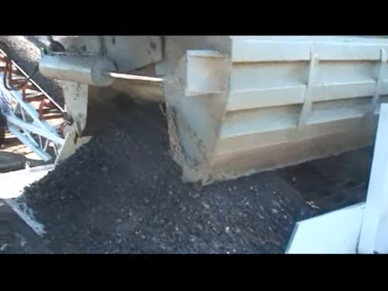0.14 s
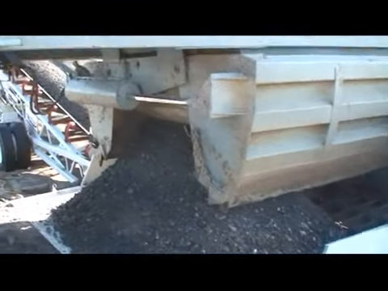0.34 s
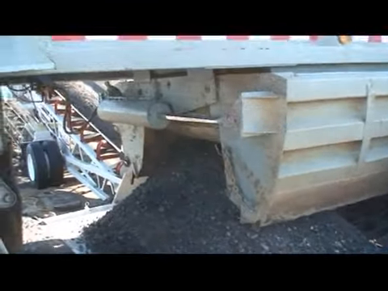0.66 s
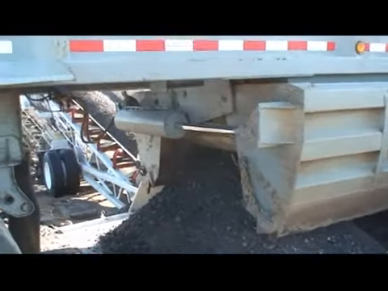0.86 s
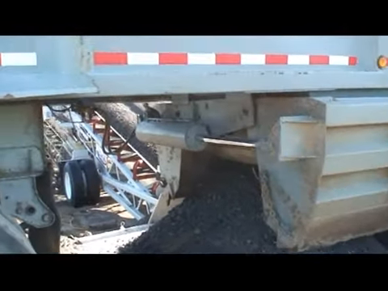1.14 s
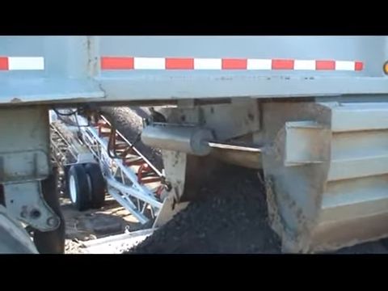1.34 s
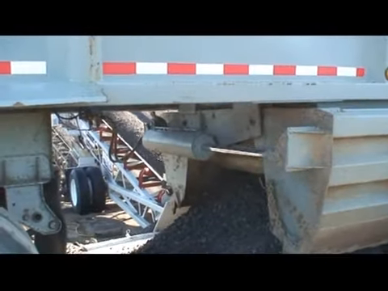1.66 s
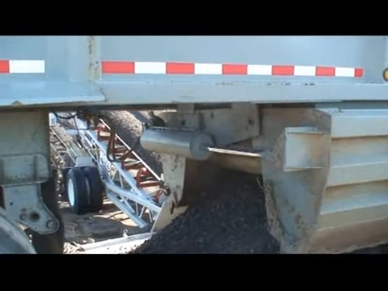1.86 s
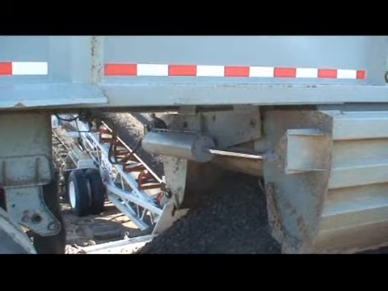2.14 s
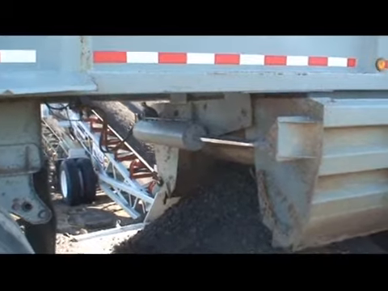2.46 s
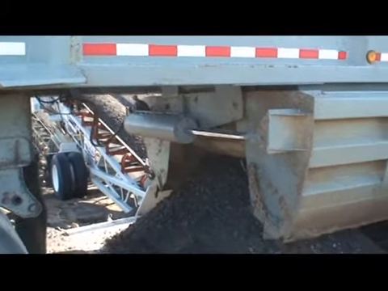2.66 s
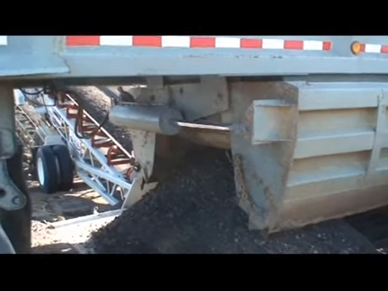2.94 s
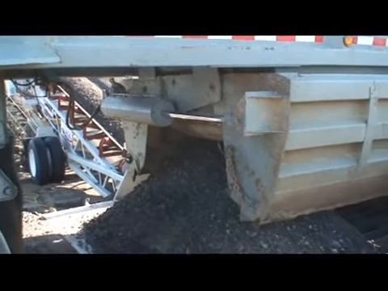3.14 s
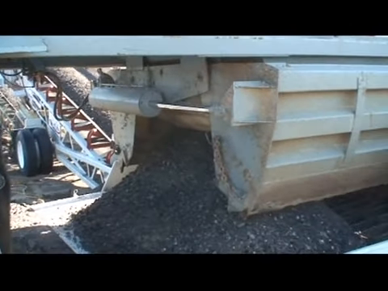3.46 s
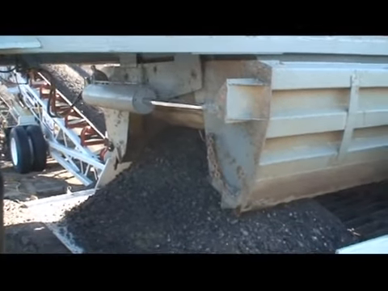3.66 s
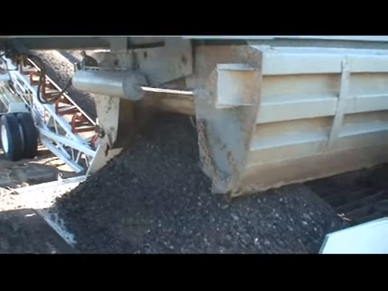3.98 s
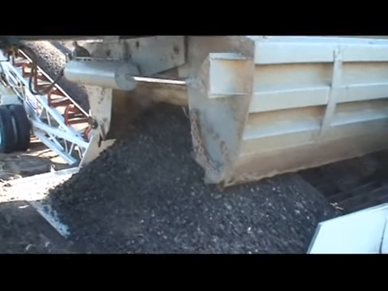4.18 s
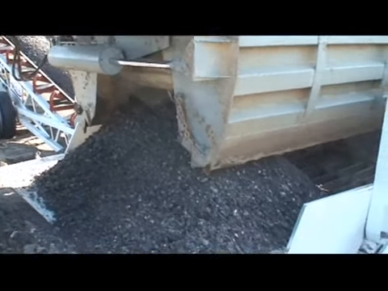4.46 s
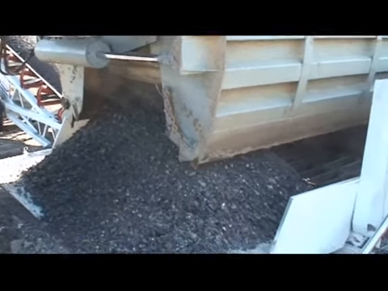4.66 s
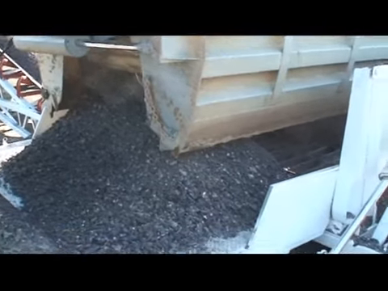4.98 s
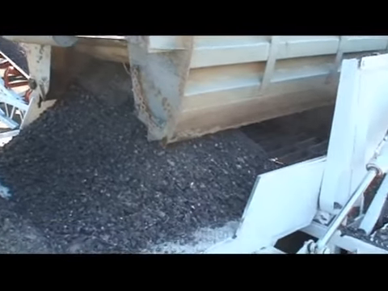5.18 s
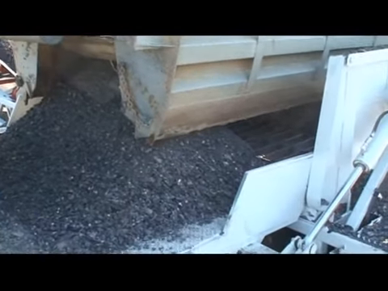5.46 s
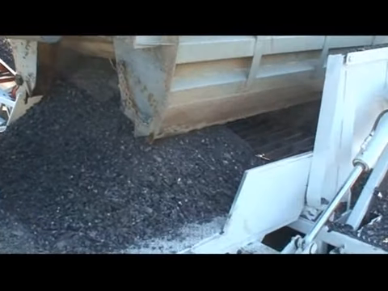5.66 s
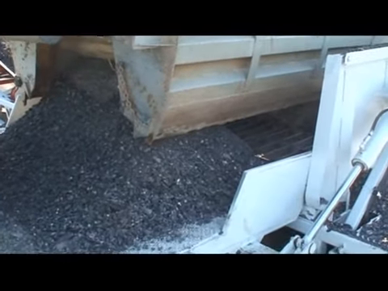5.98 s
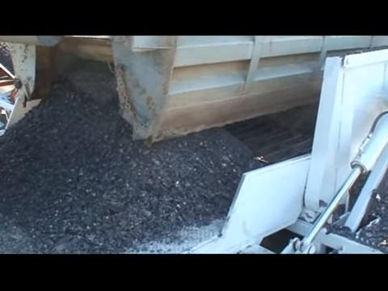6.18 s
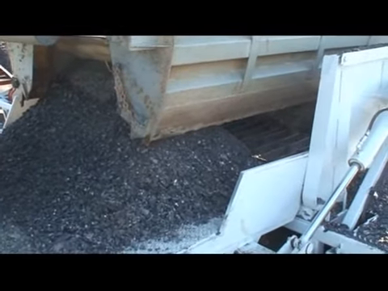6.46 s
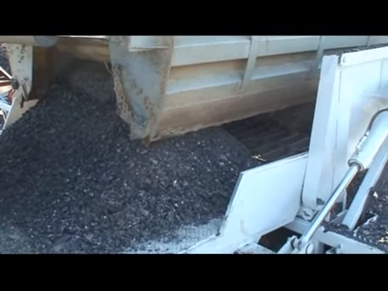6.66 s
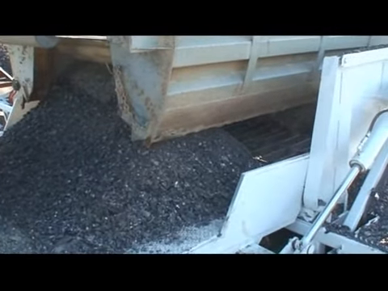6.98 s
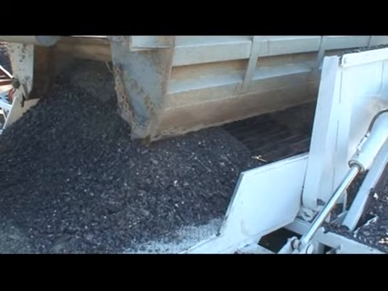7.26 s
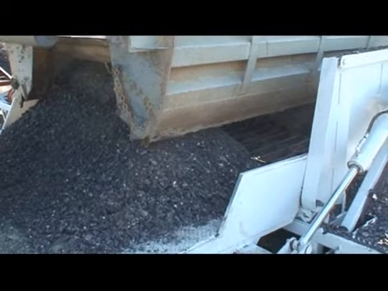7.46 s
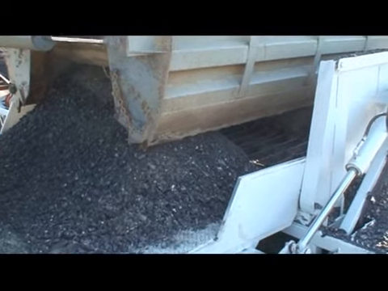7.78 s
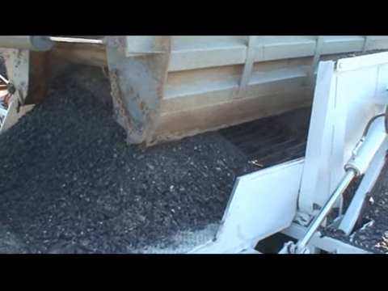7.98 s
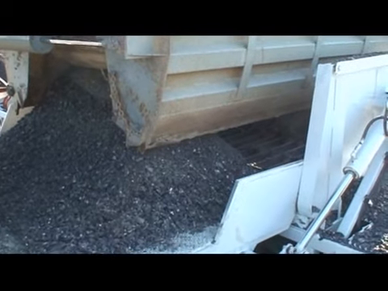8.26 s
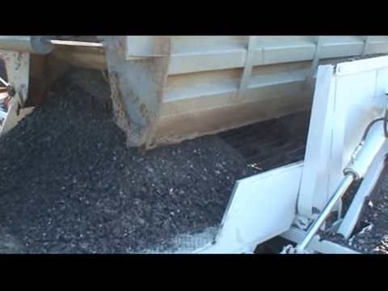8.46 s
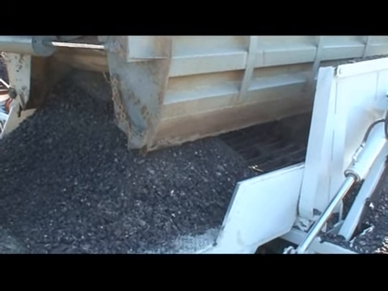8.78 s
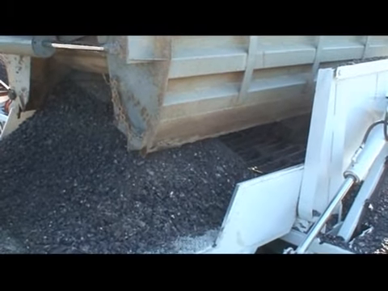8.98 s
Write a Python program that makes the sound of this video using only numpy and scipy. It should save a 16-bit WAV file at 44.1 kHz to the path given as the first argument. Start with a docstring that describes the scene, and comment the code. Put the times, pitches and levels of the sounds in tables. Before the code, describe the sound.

Heavy machinery whines high and constant over a low engine hum as stones hiss and tumble from a trailer hopper in gusty wind.

```python
"""A belly-dump trailer empties gravel into a conveyor at a breezy outdoor work site.
Throughout, a diesel hums, a hydraulic pump whines through a steel frame, oil and fan hiss, and stones slide.
At first the machine is near, then it grows fainter while gusts rumble, stones squeak and clumps tumble.
Sharp wind buffets crowd together after five seconds. From about seven seconds a hollow boom fades in
as the hopper comes near, with more squeaks and clumps. The hum, pump and whine share one shaft rotation."""
import sys
import numpy as np
from scipy.fft import rfft, irfft, next_fast_len
from scipy.io import wavfile

SR = 44100
rng = np.random.default_rng(int(sys.argv[2]) if len(sys.argv) > 2 else 0)


def write(x):
    x = np.atleast_2d(x).T
    wavfile.write(sys.argv[1], SR, np.round(np.clip(x, -1, 1) * 32767).astype(np.int16))


N = 402191
T = np.arange(N) / SR  # time in seconds
HZ = np.maximum(np.fft.rfftfreq(next_fast_len(N, True), 1 / SR), 1)  # frequencies of the filters

SHAFT_HZ, STROKES = 30.662, 11  # shaft turns per second, pump strokes per turn
# Machine loudness as the listener backs off along the trailer, then nears the hopper.
# Each row: time in seconds, level in dB.
MACHINE_LEVEL = [(0, -32), (.55, -34.5), (.95, -40), (2.6, -38.5), (3.4, -41), (5.5, -40.5), (6.4, -38),
                 (7.3, -35), (9.1, -33.5)]


def amp(db):
    """Turn decibels into a gain."""
    return 10 ** (np.asarray(db) / 20)


def curve(rows):
    """Join rows of (seconds, value) by straight lines."""
    return np.interp(T, *np.transpose(rows))


def unit(x):
    """Scale a sound to an rms (average strength) of 1."""
    return x / np.sqrt(np.mean(x ** 2))


def filtered(x, gain):
    """Apply a gain to each frequency of a sound."""
    size = next_fast_len(N, True)
    return irfft(rfft(x, size) * gain, size)[..., :N]


def colour(points):
    """Filter that gives white noise of rms 1 the spectrum in rows of (Hz, dB per Hz)."""
    hz, db = np.transpose(points)
    return amp(np.interp(np.log(HZ), np.log(hz), db)) * np.sqrt(SR / 2)


def resonance(hz, width):
    """Filter of one ringing mode, with gain 1 at its centre; both settings in Hz."""
    return 1 / (1 + 1j * (HZ ** 2 - hz ** 2) / (HZ * width))


def walk(rate):
    """Smooth random drift of rms 1; a higher rate in Hz drifts faster."""
    return unit(filtered(rng.standard_normal(N), np.exp(-(HZ / rate) ** 2)))


def pan(right_db):
    """Left and right gains that average 1, the right one louder by right_db."""
    gains = amp(np.array([[-right_db], [right_db]]) / 2)
    return gains / gains.mean()


def spread(mid, side, side_db):
    """Make left and right from a common part and an opposed part."""
    return mid + amp(side_db) * side * np.array([[1], [-1]])


def air(side_db):
    """White noise that is partly alike in both channels."""
    return spread(*rng.standard_normal((2, N)), side_db)


def burst(start, length, fade, t=T, rise=0.0026):
    """Loudness shape: a straight rise, a hold, then an exponential fade; all times in seconds."""
    t = (t - start).astype(np.float32)
    return np.clip(t / rise, 0, 1) * np.exp(-np.clip((t - length) / fade, 0, 50))


def wind(shelter_db=-4, boom_db=-5):
    """Eddies rumble and sharp buffets reach higher; engine drone and a hollow boom join near the hopper."""
    # Each row: frequency in Hz, rumble in dB per Hz against the strength below.
    rumble_spectrum = [(12, -61), (35, -20.5), (75, -23.5), (140, -23), (220, -27.5), (330, -33),
                       (500, -42.5), (1000, -53), (3000, -84)]
    # Gusts that swell and die away.
    # Each row: peak in seconds, level in dB before the swirls and trim below, half length in seconds.
    gust_rows = [(.25, -22, 0.39), (0.748, -15.5, 0.38), (2.14, -17, 0.46), (2.638, -18, .1),
                 (3.944, -22, 0.17), (4.85, -26, 0.072), (5.397, -22, 0.29), (6.53, -20, 0.24),
                 (7.322, -21, 0.082), (8.22, -22, .2)]
    # Sharp buffets of air. Each row: start in seconds, level in dB, length in seconds.
    buffet_rows = [(2.19, -30, 0.018), (2.746, -20, .006), (3.427, -24, 0.012), (5.172, -17.5, 0.053),
                   (5.257, -20.5, 0.043), (5.325, -21, 0.016), (5.433, -19.5, 0.046), (5.501, -21, 0.044),
                   (5.577, -20.5, 0.046)]
    # Tone of a buffet, before its level is set. Each row: frequency in Hz, dB per Hz.
    buffet_spectrum = [(25, -14), (120, -3.5), (220, 1.5), (400, -3.5), (750, -12), (1400, -24.5),
                       (4000, -53)]
    # low rumble between gusts, and engine drone added near the hopper, both before the trim
    breeze_db, drone_db = -28, -20
    hopper_from_s, hopper_over_s = 7.02, 0.95
    eddy_db, eddy_hz, trim_db = 1.8, 7.7, -3.5

    close = np.clip((T - hopper_from_s) / hopper_over_s, 0, 1)
    gust_power = sum((amp(db) * np.exp(-0.5 * ((T - peak) / half) ** 2)) ** 2
                     for peak, db, half in gust_rows)
    strength = np.sqrt(amp(breeze_db) ** 2 + gust_power + (amp(drone_db) * close) ** 2)
    # slow and fast swirls make the low sound uneven
    strength = strength * amp(eddy_db * walk(eddy_hz) + 1.7 * walk(24) + trim_db)

    rumble = filtered(air(side_db=-1.5), colour(rumble_spectrum)) * amp(shelter_db * close)
    boom = unit(filtered(air(side_db=-11.0), resonance(148, 120) ** 2)) * amp(boom_db) * close
    slap = unit(filtered(air(side_db=0.0), colour(buffet_spectrum)))
    slap_level = sum(amp(db) * burst(start, length, fade=0.017) for start, db, length in buffet_rows)
    return (rumble + boom) * strength + slap * slap_level


def rush(ripple=0.18):
    """Fan and oil noise: hiss that flickers in level, lifted by the frame near 3 kHz."""
    # Each row: frequency in Hz, dB per Hz against the machine, before the lift and comb below.
    rush_spectrum = [(25, -22.5), (60, -16.5), (170, -12.5), (330, -22.5), (500, -26.5), (1000, -29.5),
                     (2100, -29.5), (2500, -33.5), (3300, -29), (4500, -37), (7200, -38.5), (10900, -42),
                     (11900, -36), (14000, -40.5)]
    body = 1 + 0.32 * np.abs(resonance(3080, 70))
    # each stroke hisses a little like the one before, which puts evenly spaced ripples in the treble
    treble = np.exp(-np.log(HZ / 7500) ** 2 / 0.35)
    comb = 1 + ripple * np.cos(2 * np.pi * HZ / (STROKES * SHAFT_HZ)) * treble
    flicker = amp(1.94 * walk(21))
    return filtered(air(side_db=-10.0) * flicker, colour(rush_spectrum) * body * comb) * pan(1.7)


def engine(angle):
    """Diesel firing hum: tones tied to the shaft, wavering in strength and timing."""
    # Each row: multiple of the shaft rate, middle level in dB against the machine.
    hum_rows = [(2.4, -2), (3.5, -2), (4.5, 0), (6, 3.5), (22.2, -8), (23.6, -12)]
    unsteady = angle + 0.05 * walk(5)
    hum = sum(amp(db + 3 * walk(7)) * np.sin(multiple * unsteady) for multiple, db in hum_rows)
    return np.sqrt(2) * hum * pan(2.0)


def pump(angle, jitter=0.033, wobble=0.015, patchy_db=1.5, flutter=0.49, port_phase=0.49):
    """Pump strokes make a stack of harmonics; each shaft turn hurries and holds them a little."""
    # Levels against the machine, joined by straight lines between rows.
    # Each row: harmonic of the stroke rate, dB beside the trailer, dB at the hopper.
    pump_rows = [(1, -12, -8), (2, -3.5, -4), (3, -5.5, -2.5), (4, -7, -2), (5.1, -6, -8),
                 (6.03, -10, -13.5), (6.95, -10, -2.5), (9, 2, -1), (9.8, -28, -4.5), (11.9, -12, -16),
                 (14.2, -12, -13), (17.1, -12, -12), (18.32, -7.5, -10), (19.2, -8, -8.5), (20, -11, -14.5),
                 (24, -14.5, -13), (23.4, -8, -9.5), (25, -11, -7.5), (26, -8.5, -13), (26.8, -9.5, -11),
                 (27.7, -20, -15), (30, -24, -29), (33, -19, -17), (34.3, -20, -18.5), (36, -12, -11),
                 (40.5, -24, -25)]
    # jitter, wobble and port_phase are in radians
    stroke = STROKES * angle + wobble * np.sin(angle) + jitter * walk(29)
    stroke = (stroke % (2 * np.pi)).astype(np.float32)
    harmonic, beside_db, hopper_db = np.transpose(pump_rows)
    slow, fast = np.arange(0, T[-1] + 1, 0.25), np.arange(0, T[-1] + 1, 0.012)  # steps in seconds
    hopper = np.clip((fast - 4.0) / 1.0, 0, 1)  # 0 beside the trailer, 1 at the hopper

    out = np.zeros((2, N))
    for k in np.arange(1, int(harmonic[-1]) + 1, dtype=np.float32):
        beside = np.interp(k, harmonic, beside_db)
        at_hopper = np.interp(k, harmonic, hopper_db)
        # pressure ripple makes the upper harmonics flutter most
        ripple = 1 + flutter * np.sqrt(k / 20) * rng.standard_normal(len(fast))
        size = amp(beside + (at_hopper - beside) * hopper) * ripple
        # standing waves between the steel walls make every harmonic swell and fade
        swell = np.interp(fast, slow, amp(patchy_db * rng.standard_normal(len(slow))))
        size = np.interp(T, fast, size * swell)
        phases = rng.uniform(0, 2 * np.pi) + port_phase * rng.standard_normal((2, 1))
        out += size * np.sin(k * stroke + phases.astype(np.float32))
    # unequal pistons add a tone one shaft rate above some middle harmonics
    for k, db in [(7, -16.5), (9, -11), (10, -14.5)]:
        out += amp(db) * np.sin(k * stroke + angle)
    return np.sqrt(2) * out * pan(5.5)


def frame(angle, rough_db=-3.5, hopper_rough_db=8, throb=0.11, waver_db=0.84, waver_hz=11):
    """Steel sings with the pump's eighth harmonic; uneven strokes add a narrow noisy band around it."""
    # The frame beams its whine unevenly along the listener's path.
    # Each row: time in seconds, level over the machine in dB.
    beam_rows = [(0, 13.5), (1.3, 11.5), (3.3, 10.5), (4.55, 15.5), (5.6, 6.5), (7.1, 5), (8.3, 10.5),
                 (9.1, 7.5)]
    tone = np.sqrt(2) * np.sin(8 * STROKES * angle)
    tone = tone * (1 + throb * np.sin(angle)) * pan(14.4)
    ring = unit(filtered(air(side_db=4.5), resonance(2692, 102) ** 2)) * pan(8.5)
    # at the hopper less of the clean tone arrives, so the whine flutters more
    rough = amp(rough_db + hopper_rough_db * np.clip((T - 4.8) / 1.2, 0, 1))
    whine = (tone + rough * ring) / np.hypot(1, rough)
    return whine * amp(curve(MACHINE_LEVEL) + curve(beam_rows) + waver_db * walk(waver_hz))


def squeaks():
    """Trapped stones drag on steel plates; the narrow modes ring on after the drag ends."""
    # Each row: start in seconds, level in dB, length in seconds, which plate.
    squeak_rows = [(2.152, -24, 0.016, "first"), (2.265, -22, 0.016, "first"), (3.513, -30, 0.03, "second"),
                   (7.209, -21.5, 0.022, "second")]
    # Ringing modes of the two plates, by name.
    # Each row: frequency in Hz, width in Hz, dB against the squeak level.
    plate_modes = {"first": [(2120, 90, -9), (3970, 14, -2.5), (4650, 100, -9), (6630, 150, -7),
                   (7070, 63, -4), (7800, 62, -11)], "second": [(2000, 89, 1.5), (3640, 17, 1.5),
                   (6300, 30, -4), (7170, 93, -2), (10000, 180, -11), (12160, 100, -6)]}
    out, t = np.zeros(N), T[:SR // 2]
    for s, db, length, plate in squeak_rows:
        start = int(s * SR)
        for hz, width, mode_db in plate_modes[plate]:
            # stick and slip jolt the pitch every 64 samples, more in wide modes
            slip = np.repeat(rng.standard_normal(len(t) // 64 + 1), 64)[:len(t)]
            tone = np.sin(2 * np.pi * np.cumsum(hz + 9.0 * np.sqrt(width) * slip) / SR)
            shape = burst(0, length, fade=0.6 / width, t=t)
            out[start:start + len(t)] += amp(db + mode_db) * shape * tone
    return out * pan(3.0)


def flow_db():
    """Gravel level in dB: the machine's nearness plus the changing flow."""
    # Each row: time in seconds, level of the sliding stones over the machine in dB.
    flow_rows = [(0, 3.5), (1.2, -0.5), (2.2, 2), (3.2, -0.5), (4.8, 4), (5.6, 4), (6.3, 2), (7.1, 1.5),
                 (7.9, 2.5), (9.1, 4)]
    return curve(MACHINE_LEVEL) + curve(flow_rows)


def ticks(per_s=14, size_db=1.0, db=-14):
    """Single larger stones tick against the chute, each with its own short ring."""
    out, t = np.zeros((2, N + 2048)), np.arange(2048) / SR
    for when, pitch, size, side in rng.random((int(per_s * T[-1]), 4)):
        hz = 3000 + 2600 * pitch
        tones = np.sin(2 * np.pi * hz * t) + 0.5 * np.sin(2 * np.pi * 1.8 * hz * t)
        ring = np.exp(-t / 0.006) * tones
        crack = 0.32 * np.exp(-t / 0.001) * rng.standard_normal(len(t))
        level = amp(size_db * min(-np.log(1 - size), 2.5))  # a few stones are larger
        start = int(when * N)
        out[:, start:start + len(t)] += (ring + crack) * level * pan(6 * side - 1)
    return unit(out[:, :N]) * amp(flow_db() + db)


def gravel(grain_db=5.0, grains_per_s=5000):
    """Countless clicks slide in uneven surges; brighter clumps tumble and their largest stones ring."""
    # Sliding stones. Each row: frequency in Hz, dB per Hz against the flow level.
    stone_spectrum = [(150, -46), (600, -30), (1400, -31.5), (2300, -34.5), (3400, -33.5), (5000, -38),
                      (8000, -44.5), (13000, -59)]
    # Clumps tumbling against the chute.
    # Each row: start in seconds, level in dB, length in seconds, ring of the largest stone in Hz.
    clump_rows = [(2.226, -37, 0.016, 4100), (4.773, -32.5, 0.019, 3730), (5.74, -51, 0.017, 3720),
                  (6.45, -33, .02, 4000), (7.322, -30, 0.027, 3400), (7.535, -33, 0.043, 5800),
                  (8.252, -39, 0.033, 3500), (8.329, -35, 0.013, 3330), (8.446, -30, 0.011, 4720),
                  (8.51, -33, .01, 4510), (8.82, -32, 0.022, 3310)]
    ring_db, clump_fade_s = 1, 0.013  # ring against its clump; how fast a clump settles
    clicks = (rng.random((2, N)) < grains_per_s / SR) * rng.choice([-1, 1], (2, N))
    clicks = clicks * amp(grain_db * np.minimum(rng.exponential(size=(2, N)), 3.5))
    # the hopper walls smear every click over a few milliseconds; only its phases change
    smear = rng.standard_normal(N) * np.exp(-np.minimum(T / 0.0015, 50))
    smear_phase = np.angle(rfft(smear, next_fast_len(N, True)))
    clicks = unit(filtered(clicks, np.exp(1j * smear_phase)))
    stones = filtered(spread(*clicks, side_db=-11), colour(stone_spectrum))

    bright = unit(filtered(stones, np.minimum(HZ / 5000, 1) ** 0.82))
    rattle = amp(ring_db) * np.sqrt(2) * walk(130)
    tumbling = np.zeros((2, N))
    for start, db, length, hz in clump_rows:
        clump = bright + rattle * np.sin(2 * np.pi * hz * T)
        tumbling += amp(db) * burst(start, length, fade=clump_fade_s) * clump
    surges = amp(flow_db() + 1.35 * walk(26))
    return (stones * surges + tumbling) * pan(0.22)


def dips():
    """Gain of the brief dips as the wind strikes: a quick drop, a hold, an exponential return."""
    # Each row: start in seconds, depth in dB, seconds from start until recovery begins, recovery in seconds.
    dip_rows = [(0.75, -6.5, 0.059, .05), (0.913, -3.5, .04, .05), (2.744, -5, 0.15, 0.17),
                (3.876, -4.5, .03, 0.082), (5.195, -7, 0.095, 0.029), (5.448, -7.5, 0.039, 0.054)]
    return amp(sum(db * burst(s, hold, recovery, rise=0.024) for s, db, hold, recovery in dip_rows))


def scene(notch=0.75, hopper_notch=0.19, hunt_hz=0.012):
    """One slightly hunting shaft drives hum, pump and frame; gravel and wind lie over them."""
    angle = 2 * np.pi * np.cumsum(SHAFT_HZ + hunt_hz * walk(1)) / SR
    machine = (pump(angle) + engine(angle) + rush()) * amp(curve(MACHINE_LEVEL))
    site = (machine + frame(angle) + gravel() + ticks() + squeaks()) * dips()
    # a narrow gap just above the whine sets it off from the noise; it partly fills in at the hopper
    depth = notch + (hopper_notch - notch) * np.clip((T - 4.8) / 1.2, 0, 1)
    gap_band = filtered(site, np.exp(-((HZ - 2880) / 95) ** 4))
    return site - depth * gap_band + wind()


def record(dry):
    """Stereo width changes with frequency: wider near 10 kHz, narrow above; little is heard over 14 kHz."""
    # Stereo width. Each row: frequency in Hz, gain of the left-right difference in dB.
    width_rows = [(30, -1), (120, 0), (250, 0), (600, 1), (4000, -2), (8500, 2), (10500, 13), (12500, -20)]
    top_hz = 14050
    hz, db = np.transpose(width_rows)
    side = filtered((dry[0] - dry[1]) / 2, amp(np.interp(np.log(HZ), np.log(hz), db)))
    stereo = spread(dry.mean(axis=0), side, 0)
    return filtered(stereo, 1 / np.sqrt(1 + (HZ / top_hz) ** 500))


dry = scene()
out = record(dry)
write(out)
```